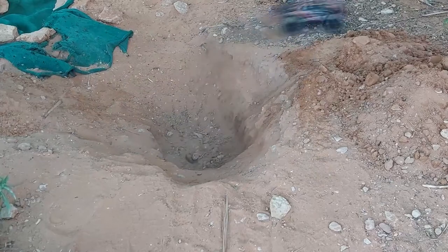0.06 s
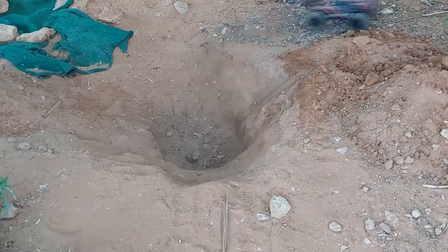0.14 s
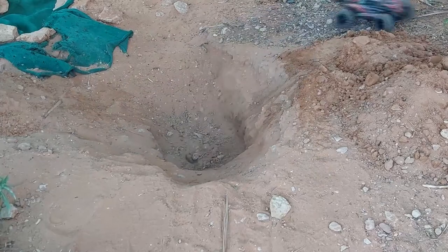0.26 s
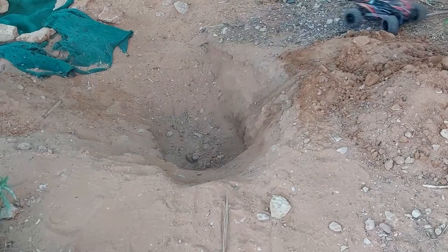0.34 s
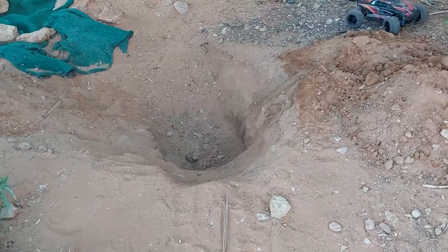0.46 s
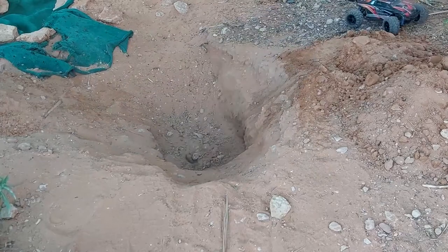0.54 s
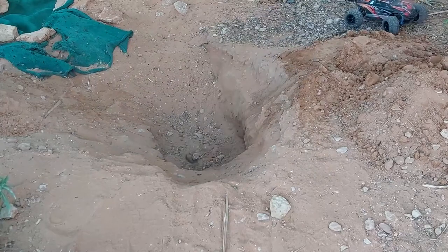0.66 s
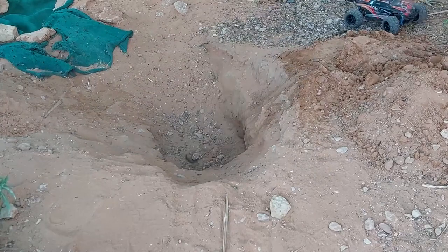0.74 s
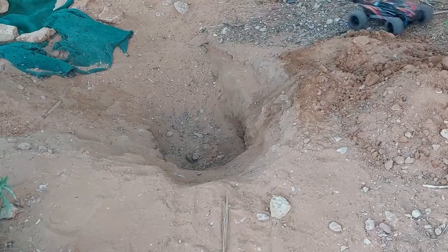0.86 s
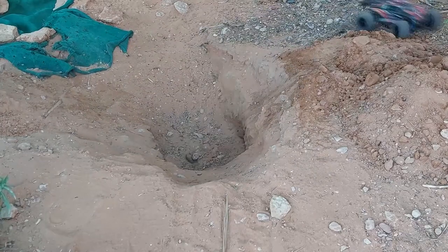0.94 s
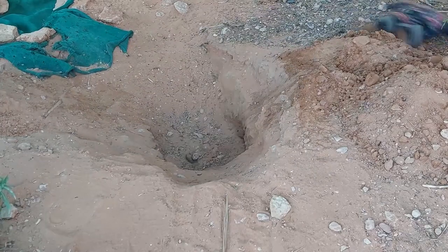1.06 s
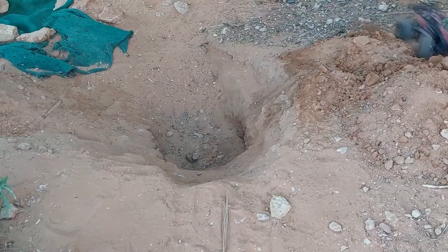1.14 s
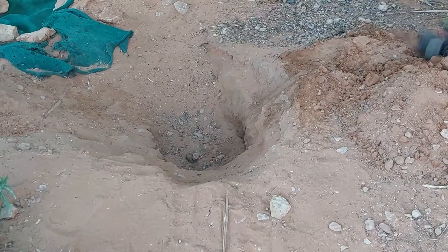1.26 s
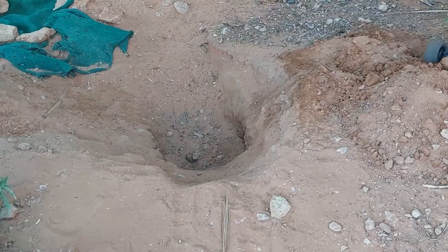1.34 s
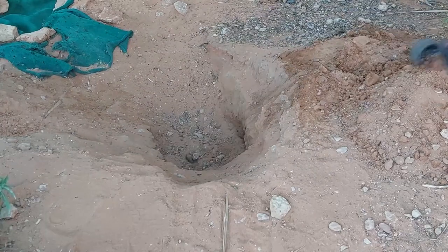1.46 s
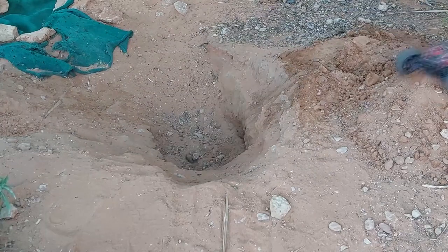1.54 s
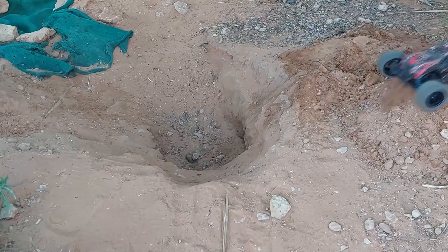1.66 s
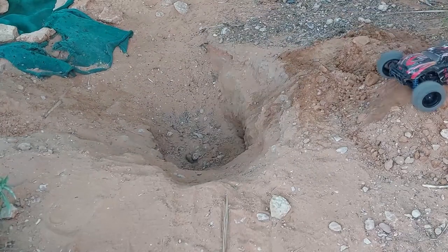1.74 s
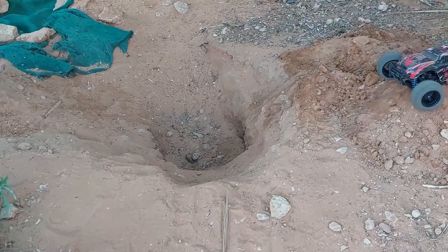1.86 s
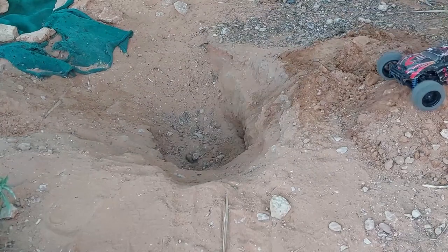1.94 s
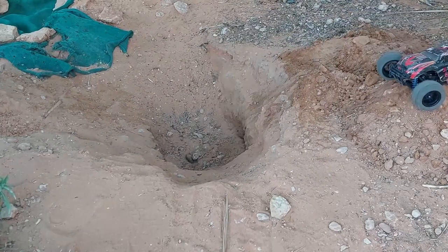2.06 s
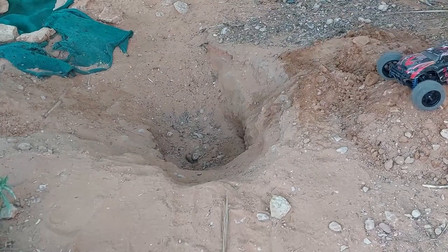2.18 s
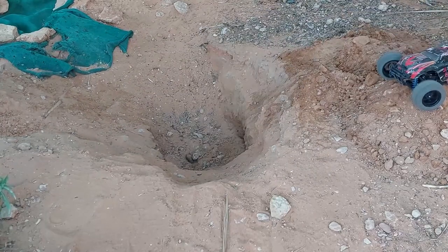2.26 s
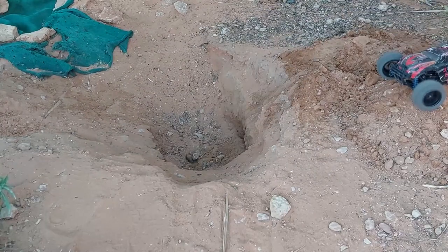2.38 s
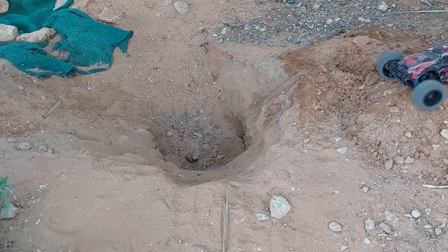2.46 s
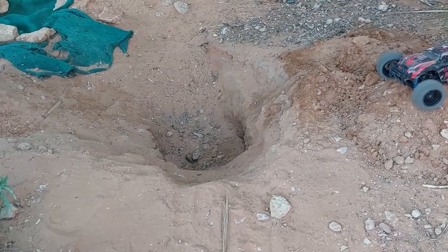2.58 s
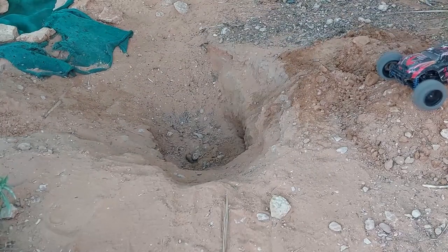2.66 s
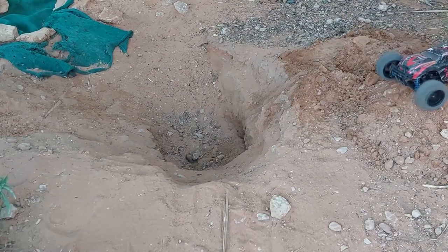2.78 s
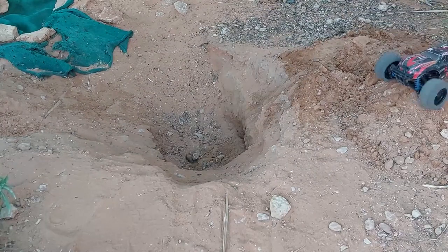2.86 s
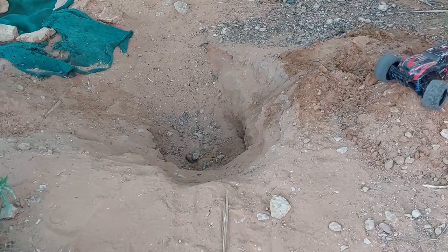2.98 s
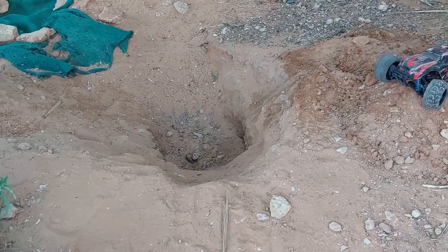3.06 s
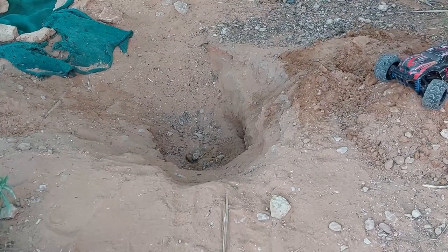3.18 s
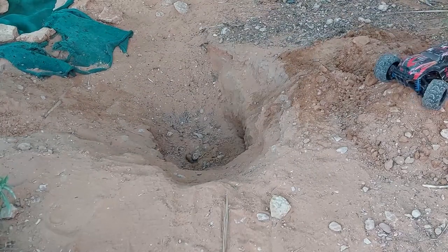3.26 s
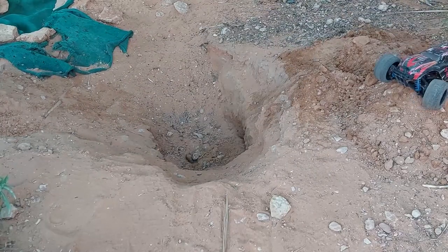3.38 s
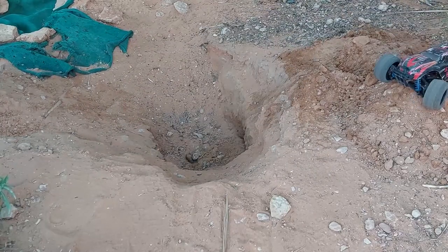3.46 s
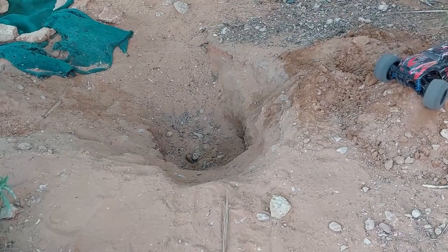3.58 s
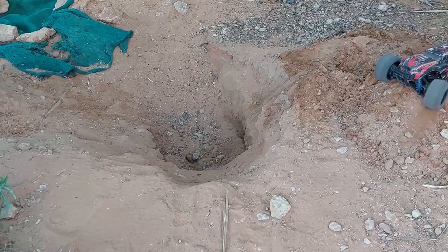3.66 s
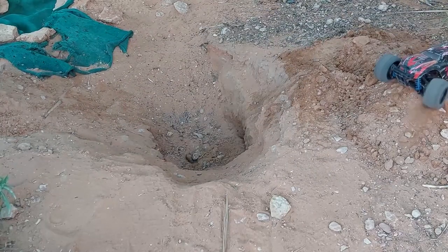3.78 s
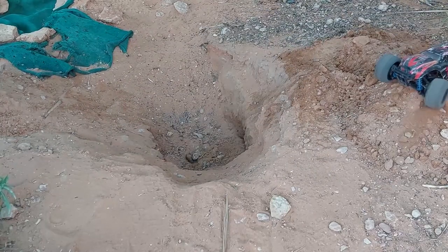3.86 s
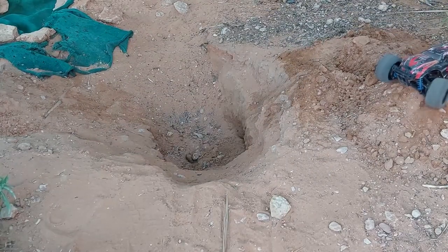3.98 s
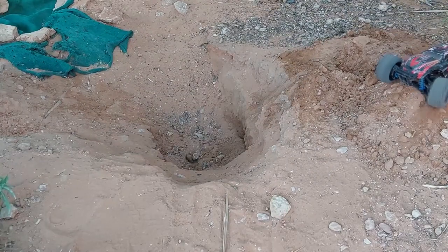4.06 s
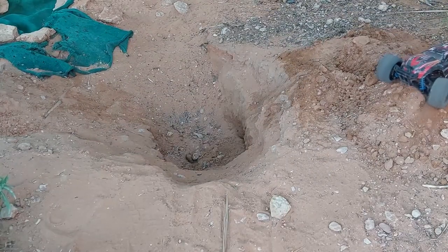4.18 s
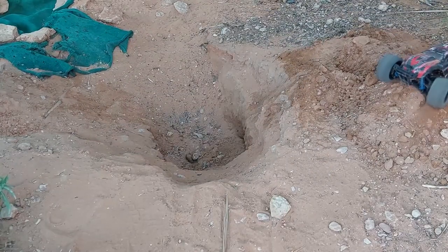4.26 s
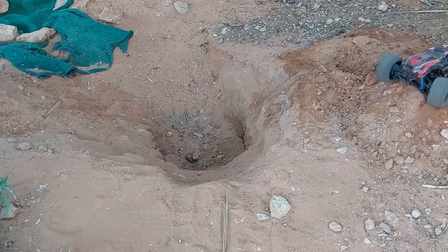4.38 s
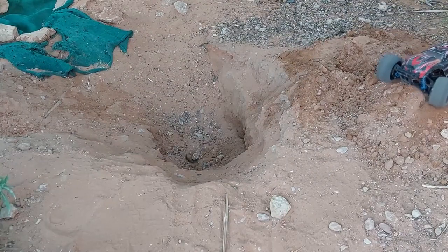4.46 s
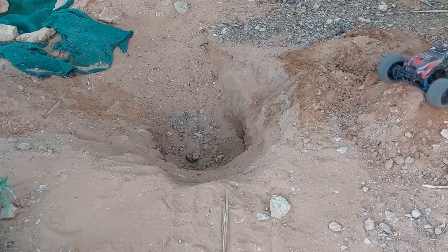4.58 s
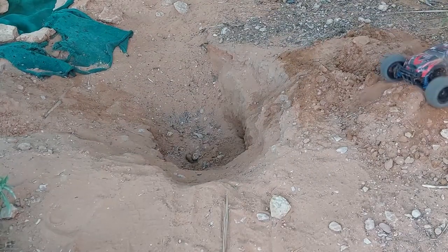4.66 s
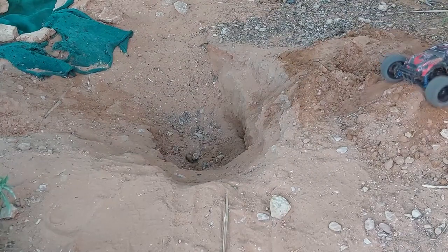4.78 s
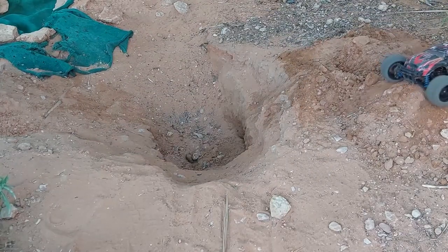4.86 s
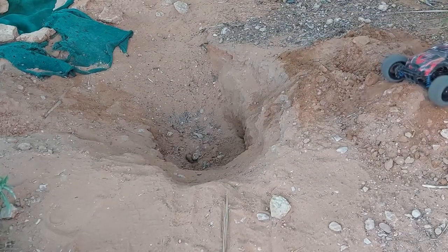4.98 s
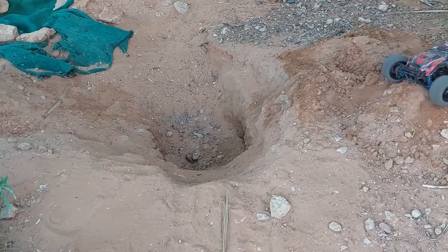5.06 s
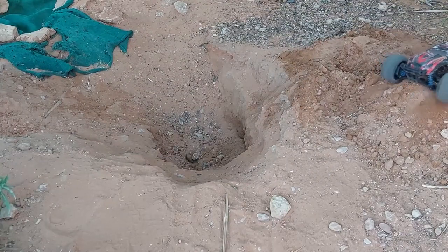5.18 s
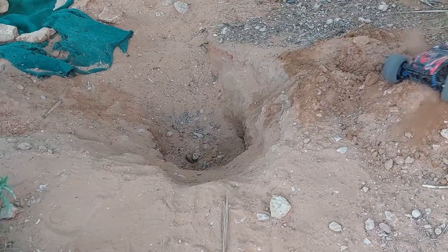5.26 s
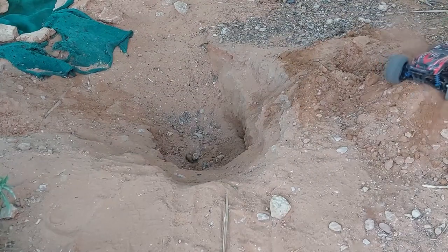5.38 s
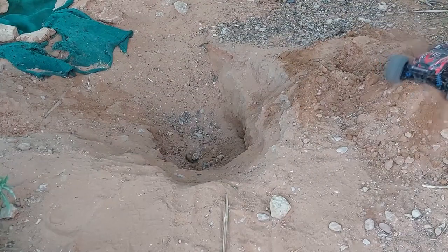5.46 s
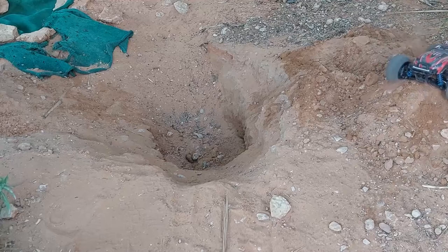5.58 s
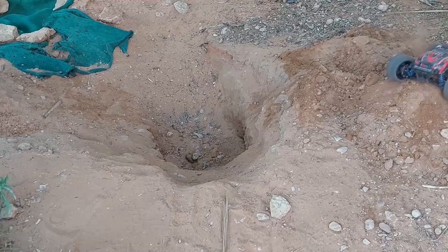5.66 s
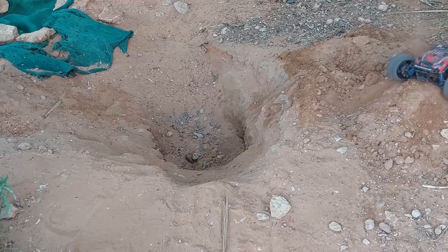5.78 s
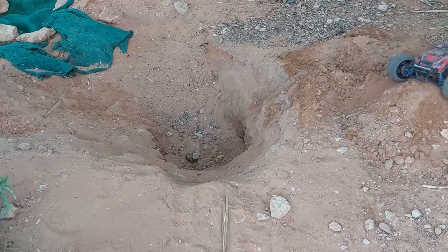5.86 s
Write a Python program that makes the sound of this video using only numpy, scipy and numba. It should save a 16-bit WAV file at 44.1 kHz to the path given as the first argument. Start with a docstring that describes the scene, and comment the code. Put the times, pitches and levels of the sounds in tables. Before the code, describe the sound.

Close outdoor stereo pickup of a small electric model truck, slightly to the right. It rolls off crunching gravel with a brief whine, then goes quiet. Three throttle bursts follow: high gear whine, plastic shell rattle, dull churning soil, bright grit spray, hollow stone knocks and tiny pebble clinks. The last burst runs on to the end. A faint low rumble and soft wind lie underneath.

```python
"""A small electric model truck, right of a two-port microphone, works through loose dirt in throttle bursts.
It first rolls off crunching gravel with a short whine, then the gravel and the tyres die away.
From about 1, 2.3 and 3.6 s the throttle returns: meshing gears whine and rattle the plastic shell, tyres
churn soil and spray grit, stones knock, pebbles clink; flecks of very high narrow hiss appear from 2.2 s.
A low far rumble with two hums, slow wind and faint outdoor air lie underneath throughout."""
import sys
import numpy as np
from scipy import signal
from scipy.fft import rfft, irfft
from scipy.io import wavfile
from scipy.ndimage import uniform_filter1d
from numba import njit

SR = 44100
rng = np.random.default_rng(int(sys.argv[2]) if len(sys.argv) > 2 else 0)


def inscribe(sig):
    """Save sig as 16-bit PCM at rate SR to the path in sys.argv[1].

    A 1-D sig is mono; a 2-D sig holds one channel per row.
    Samples are clipped to [-1, 1] before scaling.
    """
    pcm = np.round(np.clip(np.atleast_2d(sig).T, -1, 1) * 32767)
    wavfile.write(sys.argv[1], SR, pcm.astype(np.int16))


N = 261513
T = np.arange(N) / SR


def undb(db):
    """Decibels to amplitude."""
    return 10 ** (np.asarray(db) / 20)


def unit(x):
    """Scale to an RMS of 1."""
    return x / np.sqrt(np.mean(x ** 2))


def curves(rows):
    """Columns of a table as straight lines over time."""
    times, *columns = np.transpose(rows)
    return [np.interp(T, times, column) for column in columns]


@njit
def svf(x, hz, width):
    """State-variable band-pass with a moving centre, gain 1 at the centre."""
    y, band_state, low_state = np.empty(len(x)), 0., 0.
    for i in range(len(x)):
        g, damping = np.tan(np.pi * hz[i] / SR), width / hz[i]
        band = (band_state + g * (x[i] - low_state)) / (1 + g * (g + damping))
        band_state = 2 * band - band_state
        low_state += 2 * g * band
        y[i] = damping * band
    return y


def ring(x, modes):
    """A few resonant bands, summed with alternating sign."""
    total = 0
    for k, (hz, width, db) in enumerate(modes):
        total = total + (-1) ** k * undb(db) * svf(x, np.full(N, 1. * hz), 1. * width)
    return total


def colour(x, points, size=4096):
    """Causal filter with the given (frequency [Hz], gain [dB]) shape, made from the cepstrum."""
    hz, db = np.transpose(points)
    bins_hz = np.arange(size // 2 + 1) * SR / size
    cepstrum = irfft(np.log(undb(np.interp(np.log(bins_hz + 1), np.log(hz), db))))
    # folding the cepstrum forward gives minimum phase
    cepstrum[1:size // 2] *= 2
    cepstrum[size // 2 + 1:] = 0
    return signal.fftconvolve(x, irfft(np.exp(rfft(cepstrum))))[:N]


def walk(rate):
    """Random levels held 1 / rate s and slewed twice; spread 1."""
    hold = int(SR / rate)
    steps = np.repeat(rng.standard_normal(N // hold + 1), hold)
    return unit(uniform_filter1d(uniform_filter1d(steps, hold), hold)[:N])


def grains(rate, spread_db):
    """Random clicks, many small and a few large; rows: heard by both ports, left only, right only."""
    chance, side, size = rng.random((3, 3, N))
    size_db = np.minimum(-spread_db * np.log(1 - size), 4 * spread_db)
    return (chance < rate / SR) * np.sign(side - .5) * undb(size_db)


LEFT_LAG = 8  # samples


def ports(x, own_db=-99):
    """The left port is further from the truck, so later and softer; own rows reach one port only."""
    both, left, right = x if x.ndim > 1 else (x, 0, 0)
    late = np.concatenate([np.zeros(LEFT_LAG), both[:-LEFT_LAG]])
    return np.array([undb(-2.0) * (late + undb(own_db) * left),
                     undb(-0.49) * (both + undb(own_db) * right)])


# far drone and wind before port gains: (time [s], drone level [dB], wind level [dB])
DRONE_AND_WIND = [(0.0, -53, -64), (0.38, -50, -66), (0.89, -53, -59), (1.45, -49.5, -50),
                  (2.3, -53.5, -58), (2.71, -48, -61), (3.3, -59, -62), (3.88, -53, -59.5),
                  (4.66, -55, -53), (5.93, -54.5, -52)]
# two low hums before port gains: (time [s], lower hum level [dB], upper hum level [dB])
HUM_LEVELS = [(0.0, -58, -54), (0.2, -57, -54.5), (0.6, -57, -48.5), (0.73, -49.5, -49.5), (0.82, -58, -67),
              (0.92, -59, -69), (1.15, -56, -57), (1.38, -47, -49), (1.46, -51, -63), (1.6, -49, -63),
              (1.68, -66, -64), (2.1, -56, -62), (2.94, -58, -54), (3.32, -67, -71), (3.85, -60, -60),
              (4.6, -55, -60), (5.73, -58.5, -59), (5.93, -48, -52)]
# centre pitches of the lower and upper hum: [Hz] each
HUM_PITCHES = [74.4, 117.5]
# resonances that shape the drone: (frequency [Hz], width [Hz], level [dB])
DRONE_MODES = [(154, 23, -5.5), (91, 69, -8.5), (226, 118, -11)]
# broad low body ahead of those modes: (frequency [Hz], width [Hz], level [dB])
DRONE_BODY = [(134, 280, 0)]
# low band of wind on the ports: (frequency [Hz], width [Hz], level [dB])
WIND_BAND = [(52, 49, 0)]
# wind gain, one row per port, left then right: (gain [dB])
WIND_PORT_GAINS = [
    [-7],
    [3],
]


def rumble():
    """Resonant low noise with two wavering hums, and slow wind; all stronger at the right port."""
    drone_db, wind_db = curves(DRONE_AND_WIND)
    shared, left_own = (unit(ring(ring(rng.standard_normal(N), DRONE_BODY), DRONE_MODES)) for _ in range(2))
    hum = np.zeros(N)
    for db, hz in zip(curves(HUM_LEVELS), HUM_PITCHES):
        phase = 2 * np.pi * np.cumsum(hz * (1 + 0.02505 * walk(7))) / SR
        hum += undb(db + 2.2 * walk(12)) * np.sqrt(2) * np.sin(phase)
    gust, eddy = (unit(ring(ring(ring(rng.standard_normal(N), WIND_BAND), WIND_BAND), WIND_BAND))
                  for _ in range(2))
    wind = np.array([gust + 0.4 * eddy, gust])
    drone = undb(drone_db) * np.array([shared + 0.56 * left_own, shared]) + hum
    return drone * undb([[-3.5], [3]]) + undb(wind_db) * wind * undb(WIND_PORT_GAINS)


# spectrum of the outdoor hush: (frequency [Hz], level [dB])
AIR_SHAPE = [(30, -4), (150, -5.5), (300, 4.5), (400, 0), (660, -6.5), (950, -1), (1400, -10),
             (2200, -27.5), (3600, -48), (5000, -31), (6500, -30), (16000, -34)]


def air():
    """Faint outdoor hush: slowly breathing noise, unrelated at the two ports."""
    return np.array([undb(db + 2.0 * walk(3.0)) * unit(colour(rng.standard_normal(N), AIR_SHAPE))
                     for db in (-58.5, -56.5)])


# crunch of the gravel patch: (frequency [Hz], width [Hz], level [dB])
GRAVEL_MODES = [(2680, 1100, 3.5), (1520, 1370, -2)]
GRAVEL_LEFT_S, GRAVEL_FADE_DB_PER_S = 0.16, 97


def gravel():
    """Small stones crunch under the tyres as resonant grains, fading once the patch is left behind."""
    fade_db = GRAVEL_FADE_DB_PER_S * np.maximum(T - GRAVEL_LEFT_S, 0)
    crunch = np.array([unit(ring(g, GRAVEL_MODES)) for g in grains(1500, spread_db=0.5)])
    return ports(undb(-50.5 - fade_db + 3.4 * walk(40.0)) * crunch, own_db=8.0)


# gear whine before shake and trims, one table per burst: (time [s], tooth mesh rate [Hz], level [dB])
WHINE_BURSTS = [
    [(0, 4100, -50), (.08, 3915, -49), (.13, 4550, -49.5), (.2, 4010, -52), (.24, 4030, -89)],
    [(1.0, 2520, -56), (1.3, 2640, -47), (1.37, 2890, -54), (1.445, 3630, -45), (1.48, 3370, -38.5),
     (1.52, 3344, -49), (1.555, 3480, -38), (1.585, 3924, -43.5), (1.66, 4160, -37), (1.7, 4580, -41.5),
     (1.76, 5150, -41), (1.82, 5400, -42), (1.87, 5960, -54), (1.9, 5290, -39), (1.918, 4590, -39),
     (1.95, 4580, -57), (2.05, 4250, -67)],
    [(2.3, 2495, -63), (2.385, 3553, -50.5), (2.415, 3974, -46.5), (2.427, 4610, -45), (2.458, 4800, -40),
     (2.47, 5200, -41.5), (2.49, 5200, -40), (2.52, 5160, -49.5), (2.98, 4990, -49), (3.03, 4410, -50),
     (3.065, 3850, -47), (3.12, 2810, -75)],
    [(3.58, 2876, -68), (3.63, 3410, -57), (3.7, 4550, -47), (3.74, 4820, -45.5), (3.78, 5360, -50),
     (4.0, 5110, -44), (4.5, 4865, -51), (4.62, 4945, -44), (4.8, 5160, -46.5), (5.0, 4955, -52.5),
     (5.3, 5292, -40.5), (5.93, 5280, -39.5)],
]
# how hard the tyres dig, which shakes the whine: (time [s], load [1 = rolling])
TYRE_LOAD = [(0, 3.3), (1.2, 1.6), (2.2, 1.4), (2.5, 1.2), (2.56, 3.3), (2.98, 3.3), (3.04, 1.3),
             (3.74, 1.3), (3.82, 3.0), (5.1, 3.0), (5.25, 2.5)]
# plastic shell resonances, shared with the rattle: (frequency [Hz], width [Hz], level [dB])
SHELL_MODES = [(1975, 136, 4.5), (2700, 200, 4.5), (4540, 170, -1), (5380, 89, 4), (3430, 1900, -3.5)]
SLOW_PAIR = 0.495  # mesh rate of the slower gear pair over the faster
SLOW_DB = -15  # slower pair relative to the faster, before the lift
SLOW_LIFT_DB, SLOW_HZ, SLOW_WIDTH_HZ = 11, 1830, 320  # lift where it meets the low shell mode
TEETH_PER_THROB = 118  # nominal; the turn rate wanders
THROB_DB = 1.25  # swell once a turn, per unit of load
SAG, JERK = 0.04, 0.012  # pitch share lost through each throb and jerked by grip, per unit of load
TONE_DB, BLUR_DB = -5, -2  # clean mesh tone and the narrow blur around it
UPPER_STRAND, UPPER_DB = 1.3, -8  # a fainter strand above the mesh tone: pitch ratio, level
RASP_DB, RASP_WIDTH_HZ = -4, 800.  # a broad rasp around the mesh tone


def whine():
    """Teeth meet unevenly: a mesh tone swells and sags once a turn, over a slower pair, through the shell."""
    direct, left_return = np.zeros((2, N))
    load, = curves(TYRE_LOAD)
    for burst in WHINE_BURSTS:
        hz, fast_db = curves(burst)
        slow_lift = np.exp(-((SLOW_PAIR * hz - SLOW_HZ) / SLOW_WIDTH_HZ) ** 2)
        slow_db = fast_db + SLOW_DB + SLOW_LIFT_DB * slow_lift
        since_start, until_end = T - burst[0][0] + 0.017, burst[-1][0] - T + 0.055
        on = np.clip(np.minimum(since_start, until_end) / 0.0092, 0, 1)
        turn = np.cumsum(hz * (1 + 0.154 * np.tanh(walk(16)))) / SR / TEETH_PER_THROB % 1
        sag = uniform_filter1d(.5 - turn, size=100)
        grip = np.tanh(walk(300)) + .5 * walk(40)
        hz = hz * (1 + load * (SAG * sag + JERK * grip))

        def swell(db):
            throb_db = -THROB_DB * load * np.cos(2 * np.pi * turn)
            flutter_db = (3.5 + 0.59 * load) * np.tanh(walk(110))
            return on * undb(db + throb_db + flutter_db)

        for share, db in ((1, fast_db), (SLOW_PAIR, slow_db)):
            phase = 2 * np.pi * np.cumsum(share * hz) / SR
            tone = swell(db + TONE_DB) * np.sqrt(2) * np.sin(phase)
            direct += tone
            left_return += tone
        strands = ((1, fast_db + BLUR_DB, 220.),
                   (SLOW_PAIR, slow_db + BLUR_DB, 160.),
                   (UPPER_STRAND, fast_db + UPPER_DB, 400.),
                   (1, fast_db + RASP_DB, RASP_WIDTH_HZ))
        for share, db, width in strands:
            flutter = swell(db)
            for row in (direct, left_return):
                narrow = svf(rng.standard_normal(N), share * hz, width)
                row += flutter * unit(svf(narrow, share * hz, width))
    # the left port also hears a late return from the ground
    rows = (direct, np.roll(left_return, 47), np.zeros(N))
    return ports(np.array([.5 * row + 0.7 * ring(row, SHELL_MODES) for row in rows]), own_db=-2.5)


def rattle(db):
    """Gear backlash taps the shell many times a turn, in uneven clumps."""
    taps = np.array([unit(ring(g, SHELL_MODES)) for g in grains(2500, spread_db=2.0)])
    return ports(undb(db - 8.5 + 3.6 * walk(45)) * taps, own_db=1.5)


# dull spectrum of torn soil: (frequency [Hz], level [dB])
SOIL_SHAPE = [(60, -22.5), (150, -9), (300, -2.5), (480, 2.5), (900, -0.5), (1200, -3.5), (1600, -3.5),
              (2200, -6.5), (3500, -18.5), (6000, -29.5), (16000, -31)]


def soil(db):
    """Tread lugs tear clods loose: dense dull grains over a rush."""
    clods = [unit(colour(unit(g) + 0.75 * rng.standard_normal(N), SOIL_SHAPE))
             for g in grains(900, spread_db=2.0)]
    return ports(undb(db + 0.99 * walk(20)) * np.array(clods), own_db=-11.0)


# bright spectrum of sprayed sand: (frequency [Hz], level [dB])
GRIT_SHAPE = [(1500, -8), (3500, 4.5), (6000, 3.5), (7200, 0), (8500, 2.5), (10000, -4), (13000, -2.5),
              (14200, -1), (16000, -14)]
# pebble resonances, shared with the clinks: (frequency [Hz], width [Hz], level [dB])
PEBBLE_MODES = [(7700, 1900, 9), (8660, 2300, 9.5), (5760, 1600, 2), (11500, 11000, -4)]
# gritty band high in the spray: (time [s], level relative to the sand, before its flicker [dB])
HIGH_RASP_LEVEL = [(0, 0), (1.5, -24.5), (3.5, -14), (3.8, -5.5), (4.65, -5.5), (5.0, -15), (5.93, -21)]
# narrow hiss bands, shared with the hiss flecks: (frequency [Hz], width [Hz], level [dB])
HIGH_HISS_BANDS = [(14300, 246, -4.5), (14840, 300, -11)]


def grit(db):
    """Sand sprays against the body; small pebbles clink at random; narrow hiss flickers near 14.3 kHz."""
    spray = np.array([unit(colour(g, GRIT_SHAPE)) for g in grains(6000, spread_db=2.5)])
    spray += 0.22 * np.array([unit(ring(g, PEBBLE_MODES)) for g in grains(77, spread_db=4.5)])
    rasp = np.array([unit(ring(g, [(8200, 770, 0)])) for g in grains(700, spread_db=3.5)])
    spray += undb(curves(HIGH_RASP_LEVEL)[0] + 3.5 * walk(30)) * rasp
    high_hiss = np.array([unit(ring(g, HIGH_HISS_BANDS)) for g in grains(400, spread_db=8.0)])
    spray += undb(-26 + 6.5 * walk(6.2)) * high_hiss
    return ports(undb(db - 4.0 + 1.36 * np.tanh(walk(11)) + walk(24.95)) * spray, own_db=5.0)


# stones knocking the chassis: (time [s], level before trims [dB], pitch [Hz])
STONE_KNOCKS = [(0.106, -21.5, 980), (0.143, -26.5, 900), (0.195, -25.5, 630), (1.091, -29, 800),
                (1.119, -31.5, 860), (1.21, -34, 800), (1.287, -25, 930), (1.756, -24.5, 670),
                (2.558, -22.5, 523), (2.623, -40, 480), (2.7115, -16.5, 1015), (2.757, -22.5, 1000),
                (2.815, -26, 765), (2.84, -19, 1040), (2.968, -25, 916), (3.098, -30, 973),
                (4.397, -22.5, 970), (4.504, -26.5, 722), (4.951, -26.5, 920), (5.142, -24.5, 859),
                (5.236, -19, 865), (5.2495, -22, 763), (5.2607, -28, 740), (5.485, -25.5, 909),
                (5.752, -27, 915)]
BOUNCE_S, BOUNCE_DB = 0.00435, -9  # the stone strikes again
TAPS_PER_S = 80  # small stones at random
TAP_DB, TAP_SPREAD_DB = 1, 2.5  # least level over the churned soil, before trims; spread above it
TAP_LOW_HZ, TAP_OCTAVES = 418, 2.28


def knocks(soil_db):
    """A crack and a short push ring hollow plastic, bounce once and rattle; small taps come at random."""
    out, t = np.zeros(N + 2048), np.arange(2048) / SR
    when, size, pitch = rng.random((int(TAPS_PER_S * N / SR), 3)).T
    tap_db = soil_db[(when * N).astype(int)] + TAP_DB - TAP_SPREAD_DB * np.log(1 - .95 * size)
    taps = zip(when * T[-1], tap_db, TAP_LOW_HZ * 2 ** (TAP_OCTAVES * pitch))
    stones = STONE_KNOCKS + list(taps)
    for (s, db, hz), noise in zip(stones, rng.standard_normal((len(stones), 2048))):
        push = np.minimum(t / 0.00026, 1) * 1.34 * np.exp(-t / 0.0015)
        blow = -np.sin(2 * np.pi * hz * t) * push
        blow = blow + undb(BOUNCE_DB) * np.interp(t - BOUNCE_S, t, blow, left=0)
        crack_noise = unit(svf(noise, np.full(len(t), 2000.), 1200.0))
        crack = (t / 0.002) * np.exp(1 - t / 0.00063) * crack_noise
        tail_noise = unit(svf(noise, np.full(len(t), 1. * hz), 0.75 * hz))
        tail = np.minimum(t / 0.0016, 1) * np.exp(-t / 0.013) * tail_noise
        start = int(s * SR)
        out[start:start + len(t)] += undb(db + 1.5) * (blow + 0.3 * crack + 0.31 * tail)
    # each port also gets its own faint late copy
    return ports(np.array([out[:N], np.roll(out[:N], 140), np.roll(out[:N], 75)]), own_db=-17.5)


# pebbles clinking on hard parts: (time [s], level before trims [dB], own ring [Hz])
PEBBLE_CLINKS = [(0.022, -28, 8430), (0.083, -31, 8200), (0.3253, -36.5, 8440), (0.405, -55, 6000),
                 (0.504, -53.5, 6200), (1.011, -45, 8000), (1.12, -35, 8100), (1.19, -37, 8200),
                 (1.6204, -32, 8300), (1.755, -27, 8400), (1.913, -29, 8330), (2.158, -46, 9000),
                 (2.241, -58, 9500), (2.29, -49, 8600), (2.381, -39, 5300), (2.502, -26, 8300),
                 (2.541, -31, 8300), (2.561, -18, 8300), (2.701, -27.5, 8150), (2.99, -31, 6200),
                 (3.167, -60, 5170), (3.208, -46, 4630), (3.25, -61, 5800), (3.2868, -57, 6800),
                 (3.9539, -29, 8250), (4.026, -32, 8000), (4.065, -32, 8000), (4.286, -30, 8160),
                 (4.378, -28, 8200), (4.4855, -27.5, 8300), (4.553, -26, 8200), (4.8579, -28, 8300),
                 (5.039, -33, 8300), (5.151, -31, 8200)]


def clinks():
    """A hard tick with a crumb of scatter, rung through the pebble resonances and each pebble's own ring."""
    kick, t = np.zeros((2, 3, N + 512)), np.arange(512) / SR
    crumbs = rng.standard_normal((len(PEBBLE_CLINKS), 3, 512)) * np.exp(-t / 0.004)
    for (s, db, hz), crumb in zip(PEBBLE_CLINKS, crumbs):
        own = [undb(11.5) * svf(c, np.full(len(t), 1. * hz), 700.) for c in crumb]
        start = int(s * SR)
        kick[:, :, start:start + len(t)] += undb(db - 12.5) * np.array([crumb, own])
    rung = np.array([ring(tick[:N], PEBBLE_MODES) + own[:N] for tick, own in zip(*kick)])
    return ports(rung, own_db=6.5)


# short flecks of narrow high hiss: (time [s], level before trims [dB])
HISS_FLECKS = [(2.1575, -42), (2.2413, -52), (2.5057, -41), (2.601, -38), (2.9215, -40), (2.9901, -32),
               (3.8666, -39), (4.3096, -38), (4.8524, -39), (5.1764, -40), (5.5518, -39), (5.673, -40)]


def hiss_flecks():
    """Short flecks of narrow hiss near 14.3 kHz: decaying noise bursts through the high bands."""
    bursts, t = np.zeros((3, N + 512)), np.arange(512) / SR
    for (s, db), noise in zip(HISS_FLECKS, rng.standard_normal((len(HISS_FLECKS), 3, 512))):
        start = int(s * SR)
        bursts[:, start:start + len(t)] += undb(db + 19) * noise * np.exp(-t / 0.004)
    return ports(np.array([ring(row[:N], HIGH_HISS_BANDS) for row in bursts]), own_db=7.0)


# effort of the spinning tyres, before trims: (time [s], churned soil level [dB], thrown grit level [dB])
TYRE_EFFORT = [(0.0, -37.5, -52), (0.16, -39.5, -52), (0.26, -44, -57), (0.38, -48, -65.5),
               (0.5, -61.5, -76), (0.62, -88, -104), (0.8, -67.5, -83), (0.94, -58.5, -73),
               (1.04, -43.5, -53), (1.4, -47, -50.5), (1.75, -38, -40.5), (1.93, -41.5, -47),
               (2.06, -50.5, -54), (2.22, -52, -61.5), (2.35, -49, -54), (2.54, -36, -38.5),
               (3.0, -36, -38.5), (3.1, -45, -49.5), (3.19, -60, -70.5), (3.3, -73.5, -76),
               (3.47, -68.5, -84), (3.57, -51.5, -62.5), (3.68, -42.5, -48), (3.85, -38.5, -44.5),
               (5.2, -37, -44), (5.32, -39, -45), (5.93, -37, -44.5)]
GRIT_REF_DB = -50
RATTLE_DB, RATTLE_SLOPE = -38.5, 1.54  # rattle drive with grit at GRIT_REF_DB; dB per dB of grit
RATTLE_TOP_DB = -39.5  # ceiling of that drive


def scene():
    """Tyre effort drives soil, taps, grit and shell rattle; the other layers keep their own timing."""
    soil_db, grit_db = curves(TYRE_EFFORT)
    rattle_db = np.minimum(RATTLE_DB + RATTLE_SLOPE * (grit_db - GRIT_REF_DB), RATTLE_TOP_DB)
    surroundings = rumble() + air()
    truck = gravel() + whine() + rattle(rattle_db)
    dirt = soil(soil_db) + grit(grit_db)
    hits = knocks(soil_db) + clinks()
    return surroundings + truck + dirt + hits + hiss_flecks()


# uneven shading of the left port by the case: (frequency [Hz], gain [dB])
LEFT_PORT_SHAPE = [(300, -1), (1700, -0.5), (3900, 1.5), (5150, -0.5), (6200, -1.5), (8000, -1), (9600, 0),
                   (11300, -2), (13000, 1), (15200, -1.5)]
TOP_HZ = 15700


def record(dry):
    """The case shades the left port unevenly; the recorder cuts the top steeply."""
    shaded = np.array([colour(dry[0], LEFT_PORT_SHAPE), dry[1]])
    return signal.sosfilt(signal.ellip(12, .2, 90, TOP_HZ, fs=SR, output="sos"), shaded)


dry = scene()
out = record(dry)
inscribe(out)
```